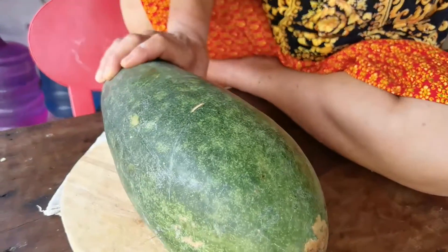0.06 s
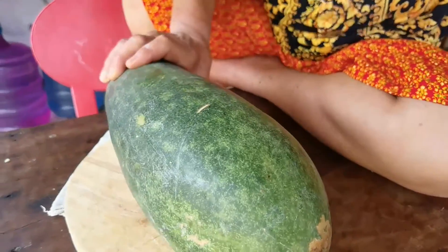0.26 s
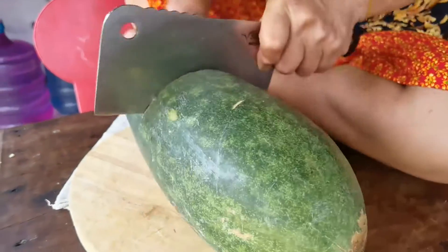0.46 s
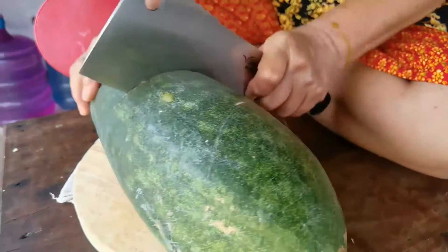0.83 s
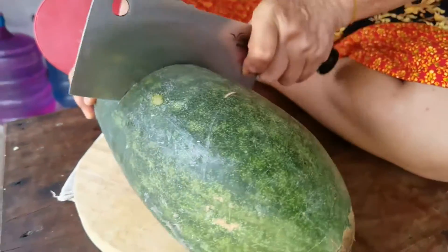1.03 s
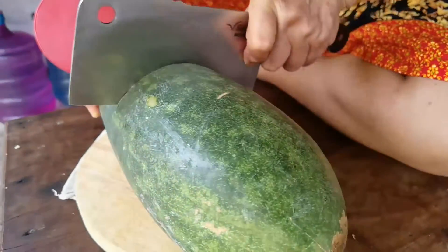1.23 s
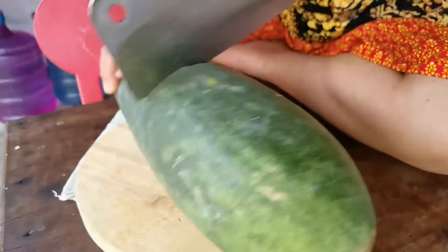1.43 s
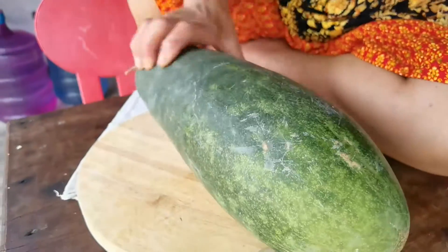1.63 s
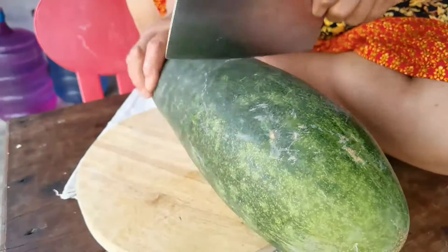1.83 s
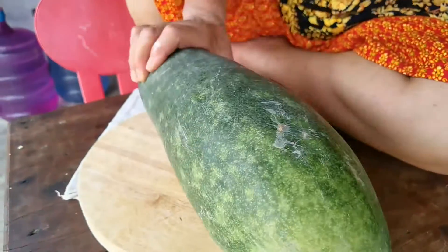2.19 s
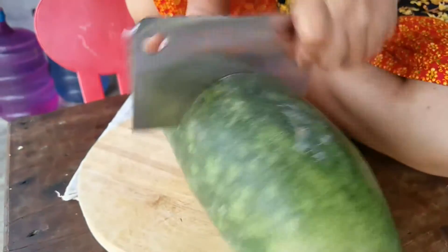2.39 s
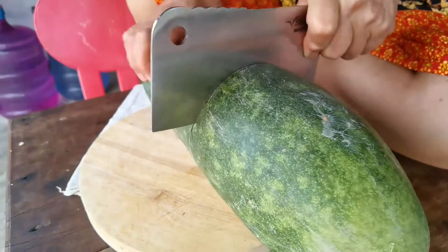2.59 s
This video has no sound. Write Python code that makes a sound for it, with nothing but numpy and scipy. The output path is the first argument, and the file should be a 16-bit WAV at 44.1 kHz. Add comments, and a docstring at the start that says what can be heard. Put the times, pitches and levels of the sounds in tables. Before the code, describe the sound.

Two close cleaver chops crack a melon's rind, slicing wet flesh and thudding on wood.

```python
"""A steel cleaver chops twice into a big melon on a wooden board, close by, over a low room rumble.
First the edge knocks on the rind and cracks it. The blade hisses into the wet flesh and wags in the cut,
while melon and table thud. A faint whistle comes and goes behind, and then the blade is drawn out.
A hand turns the melon, which rubs and bumps, and the free blade taps it and rings.
Last comes a dry tick as the hand takes hold, then the second chop cracks, thuds and wags."""
import sys
import numpy as np
from scipy import signal
from scipy.fft import rfft, irfft, next_fast_len
from scipy.io import wavfile
from scipy.ndimage import uniform_filter1d, map_coordinates

SR = 44100
rng = np.random.default_rng(int(sys.argv[2]) if len(sys.argv) > 2 else 0)


def transcribe(u):
    """Save the signal u as a 16-bit wav file named by the first command-line argument.

    u: samples, shape (n,) or (channels, n), limited to [-1, 1]; the rate is SR.
    q: integer samples, one column per channel.
    """
    v = np.clip(np.atleast_2d(u).T, -1, 1)
    q = np.round(v * 32767).astype(np.int16)
    wavfile.write(sys.argv[1], SR, q)


N = 121275

# A "colour" says how strong each frequency is in a noise. A "fade" is the time to drop by 60 dB.
# room rumble and hiss: (frequency [Hz], relative level [dB])
ROOM_COLOUR = [(30, -6.5), (80, -0.5), (130, -9.5), (240, -17), (330, -23.5), (700, -35.5), (2500, -36.5),
               (4000, -42), (8700, -36), (11500, -54.5), (16000, -100)]
# a faint, thin whistle: (start [s], length [s], level [dB])
WHISTLES = [(0.61, 0.13, -50), (0.863, 0.21, -60)]
# how alike a noise is in the two ears: (frequency [Hz], likeness [0 to 1])
EAR_LIKENESS = [(250, 0.94), (700, 0.57), (2000, 0.028), (9000, 0.026)]
# how long the room echoes: (frequency [Hz], fade [s])
ECHO_FADES = [(100, 0.17), (1000, 0.5), (12000, 0.088)]

# the hand taking hold: (time [s], level [dB])
GRIPS = [(2.2217, -37)]
# dry contact with the rind: (frequency [Hz], relative level [dB])
CONTACT_COLOUR = [(1500, -14), (2900, 2.5), (8500, -4), (14000, -30)]
# skin and blade rubbing the rind: (start [s], rise [s], hold [s], fade [s], level [dB])
RUBS = [(.11, 0.027, 0.054, 0.11, -46), (.55, 0.11, 0.041, 0.5, -44), (1.33, 0.068, 0.014, 0.35, -43),
        (1.5, 0.045, 0.039, 0.73, -49), (1.78, 0.099, 0.11, 0.088, -41.5)]
# the rubbing noise: (frequency [Hz], relative level [dB])
RUB_COLOUR = [(110, -9), (210, 19), (450, -11), (2000, -10), (4500, -3.5), (8600, -0.5), (12000, -19),
              (16000, -29)]
# the melon shifting: (start [s], rise [s], hold [s], fade [s], level [dB])
SCUFFS = [(.183, 0.0061, 0.0049, 0.12, -31), (.237, 0.0051, .003, 0.032, -29.5),
          (2.315, 0.015, 0.002, 0.024, -34)]
# its dull scuffing noise: (frequency [Hz], relative level [dB])
SCUFF_COLOUR = [(100, -0.5), (283, 2.5), (550, -9.5), (1500, -8.5), (4000, -26), (9000, -56)]
# the blade drawn out: (start [s], rise [s], hold [s], fade [s], level [dB])
PULLS = [(1.191, 0.049, 0.07, 0.28, -37.5)]
# its gritty noise: (frequency [Hz], relative level [dB])
PULL_COLOUR = [(300, -11.5), (2400, -4.5), (4000, -21), (5000, -3.5), (8400, 10), (11500, -3), (16000, -8)]
# wet flesh sliding along the blade: (start [s], rise [s], hold [s], fade [s], level [dB])
SLICES = [(0.217, .004, .02, 0.18, -30), (0.267, 0.062, 0.013, 0.3, -25.5),
          (2.297, 0.0047, 0.024, 0.16, -36), (2.327, 0.076, 0.034, 0.32, -31.5)]
# its wet hiss: (frequency [Hz], relative level [dB])
FLESH_COLOUR = [(80, -12.5), (200, 4.5), (450, -2.5), (1000, -17), (1900, -14.5), (2700, -9), (4300, -13),
                (5200, -5), (9000, -1.5), (11500, -13), (15000, -23)]

# the free blade tapping the rind: (time [s], ring level [dB], click level [dB])
TAPS = [(1.407, -33, -35.5), (1.7286, -32, -16), (1.772, -48, -22.5)]
# the click of a tap: (frequency [Hz], relative level [dB])
CLICK_COLOUR = [(400, -9), (1700, -25), (2460, -13), (4400, -34), (5300, -9.5), (6420, -3), (7800, -16),
                (9000, -3.5), (11500, -21.5), (16000, -32)]
# tones of the free blade: (frequency [Hz], relative level [dB], fade [s])
FREE_TONES = [(1314, -13.5, 0.12), (2370, -11.5, 0.14), (8410, 5.5, 0.19)]
# extra tones from a hard blow on the edge: (frequency [Hz], level [dB], fade [s])
EDGE_TONES = [(3385, -39, 0.3), (6480, -24, .04), (9900, -26.5, 0.2)]
# the stuck blade slapping the walls of the cut: (time [s], level [dB])
WAGS = [(0.343, -35), (0.39, -32), (0.439, -42), (0.483, -46), (2.42, -25.5), (2.471, -29.5), (2.52, -37),
        (2.562, -42.5), (2.606, -53.5), (2.679, -56)]
# tones of the stuck blade: (frequency [Hz], relative level [dB], fade [s])
STUCK_TONES = [(2775, -1, 0.02), (3815, -0.5, 0.028), (5167, 3, 0.029), (6560, -1, 0.047),
               (8353, 1.5, 0.077), (10200, 0.5, 0.048)]

# the melon bumping the board: (time [s], melon level [dB], table level [dB], melon pitch [factor])
BUMPS = [(.245, -19, -18.5, 1), (0.259, -15, -15, 0.97), (0.3, -16, -10, 0.91), (0.354, -22, -26, 0.93),
         (1.308, -27.5, -62, 0.91), (1.322, -20, -52, 0.64), (1.385, -31.5, -28.5, 0.92),
         (1.425, -35, -20.5, 0.91), (1.484, -26, -28.5, 0.93), (1.663, -71, -30, 0.78),
         (1.731, -14.5, -18, 0.94), (1.773, -33, -17, 0.92), (1.933, -33, -28, 0.99),
         (2.327, -22, -21, 0.97), (2.369, -11.5, -15, 0.95), (2.394, -43, -11.5, 1), (2.43, -21, -29, 0.86),
         (2.515, -30.5, -31.5, 0.9), (2.648, -39.5, -28, 0.78)]
# tones of the hollow melon: (base frequency [Hz], relative level [dB], fade [s])
MELON_TONES = [(129.9, -14.5, 0.26), (191.5, -4, 0.16), (222.3, -2, 0.15), (252.6, -4.5, 0.22)]
# tones of the table: (frequency [Hz], relative level [dB], fade [s])
TABLE_TONES = [(45.2, -6, 0.042), (62.84, 0.5, 0.19), (101.1, -17, 0.47)]

# the edge meeting the rind: (time [s], level [dB])
KNOCKS = [(.188, -33.5)]
# tones of the hard rind: (frequency [Hz], relative level [dB], fade [s])
RIND_TONES = [(779, 5.5, 0.078), (1390, -9.5, 0.09)]
# the blade breaking through the rind: (start [s], length [s], level [dB])
BITES = [(0.226, 0.013, -14.5), (2.309, 0.01, -15.5)]
# single snaps as the rind splits: (time [s], level [dB])
SNAPS = [(0.2333, -1), (0.2401, -4.5), (2.3135, -3.5), (2.3193, -3), (2.3259, -8.5)]
# the edge catching in the cut: (time [s], level [dB])
CATCHES = [(0.768, -30.5), (1.214, -31.5), (1.353, -28.5), (2.646, -34.5)]
# the cracking noise: (frequency [Hz], relative level [dB])
RIND_COLOUR = [(300, -50), (800, -25), (1500, -19), (2000, -29), (2840, -15), (4200, -21.5), (5200, -11.5),
               (7300, -9.5), (8640, -0.5), (10900, -17.5), (15000, -28.5)]


def amp(db):
    """Turn decibels into a number to multiply a sound by."""
    return 10 ** (np.asarray(db) / 20)


def unit(x):
    """Scale a signal to an average strength (rms) of 1."""
    return x / np.sqrt(np.mean(x ** 2) + 1e-20)


def look_up(points, hz):
    """Read between the rows of a (frequency, value) table, on a log frequency scale."""
    frequencies, values = np.transpose(points)
    return np.interp(np.log(hz + 1), np.log(frequencies + 1), values)


def since(s):
    """Seconds since time s, zero before it."""
    return np.maximum(np.arange(N) / SR - s, 0)


def wobble(rate):
    """A smooth curve through `rate` random values a second."""
    return map_coordinates(rng.standard_normal(int(N * rate / SR) + 4), [np.arange(N) * rate / SR])


def filtered(x, response):
    """Multiply each frequency in x by response(hz)."""
    size = next_fast_len(N + 8192)
    return irfft(rfft(x, size) * response(np.fft.rfftfreq(size, 1 / SR)), size)[..., :N]


def noise(colour, grain_db, grain_rate, pulses=1):
    """Stereo noise of strength 1, clumped into grains or pulses, its colour drifting in patches."""
    def colour_and_width(hz):
        angle = np.arccos(np.clip(look_up(EAR_LIKENESS, hz), -1, 1)) / 2
        return amp(look_up(colour, hz)) * [np.cos(angle), np.sin(angle)]

    spectra = signal.stft(rng.standard_normal((2, N)), nperseg=512)[2]
    patches = uniform_filter1d(rng.standard_normal(spectra.shape[1:]), size=3, axis=0)
    patches = unit(uniform_filter1d(patches, size=12, axis=1))
    drift_db = 3.5 * patches * np.minimum(np.arange(len(patches)) / 8, 1)[:, None]  # less in the bass
    patchy = signal.istft(spectra * amp(drift_db), nperseg=512)[1][:, :N]
    grainy = patchy * amp(grain_db * wobble(grain_rate))
    middle, side = filtered(grainy * pulses, colour_and_width)
    return unit(np.array([middle + side, middle - side]))


def stroke(start, rise, hold, fade, db):
    """Loudness curve of a movement: it swells, holds and dies away."""
    return amp(db - 60 * since(start + rise + hold) / fade) * np.minimum(since(start) / rise, 1)


def hit(s, rise, fade):
    """Loudness curve of something struck at time s."""
    t = since(s)
    return (1 - np.exp(-t / rise)) * amp(-60 * t / fade)


def ring(s, tones, rise, spread, blur, pitch=1):
    """Fading tones from time s; spread puts the ears out of step, blur makes the tones waver."""
    t = np.arange(SR // 2) / SR
    out = np.zeros((2, N + SR))
    for hz, db, fade in tones:
        ear_phase = spread * rng.standard_normal((2, 1))
        drift = blur * np.cumsum(rng.standard_normal(len(t))) / np.sqrt(SR)
        level = amp(db - 60 * t / fade) * (1 - np.exp(-t / rise))
        wave = np.sin(2 * np.pi * hz * pitch * t + ear_phase + drift)
        out[:, round(s * SR):][:, :len(t)] += level * wave
    return out[:, :N]


def fibres(typical_per_s=700):
    """Fibres part one after another at an uneven rate, each with a short, sharp pulse."""
    parted = np.cumsum(typical_per_s * amp(4 * wobble(typical_per_s / 2))) / SR
    return np.exp(-3 * (parted % 1))


def background(whistle_hz=3217):
    """Steady room rumble and hiss, with a faint whistle that comes and goes."""
    swell = sum(amp(db) * np.sin(np.pi * np.minimum(since(s) / length, 1)) for s, length, db in WHISTLES)
    whistle = np.array([wobble(160) for ear in range(2)]) * np.sin(2 * np.pi * whistle_hz * since(0))
    return amp(-44.5) * noise(ROOM_COLOUR, grain_db=1.5, grain_rate=830) + swell * whistle


def room_echo(x):
    """The room smears each sound into a short tail, a separate one for each ear."""
    hz, t, spectra = signal.stft(rng.standard_normal((2, SR // 2)), SR, nperseg=256)
    dying = amp(-60 * t / look_up(ECHO_FADES, hz)[:, None])
    tail = signal.istft(spectra * dying, SR, nperseg=256)[1]
    delayed = np.pad(x, ((0, 0), (200, 0)))
    return signal.fftconvolve(delayed, tail / np.linalg.norm(tail[0]), axes=1)[:, :N]


def hand_grip():
    """The hand takes hold with a short, dry tick."""
    tick = sum(amp(db) * hit(s, rise=0.00079, fade=0.05) for s, db in GRIPS)
    return tick * noise(CONTACT_COLOUR, grain_db=-7, grain_rate=800)


def rubbing():
    """The blade hisses into the flesh and back out; the melon scuffs and rubs as it moves."""
    wet = noise(FLESH_COLOUR, grain_db=2, grain_rate=900, pulses=fibres())
    grit = noise(PULL_COLOUR, grain_db=2, grain_rate=700, pulses=fibres())
    grit *= amp([[0.75], [-0.75]])  # a little to the left
    scuff = noise(SCUFF_COLOUR, grain_db=2, grain_rate=400)
    rub = noise(RUB_COLOUR, grain_db=2, grain_rate=1000)
    layers = (SLICES, wet), (PULLS, grit), (SCUFFS, scuff), (RUBS, rub)
    return sum(stroke(*move) * sound for moves, sound in layers for move in moves)


def free_blade(stop_s=0.051):
    """Each tap clicks, stops the earlier ring and starts a new one; the hardest adds the edge tones."""
    hardest_time = max(TAPS, key=lambda tap: tap[-1])[0]
    next_times = [tap[0] for tap in TAPS[1:]] + [N / SR]
    ringing = 0
    for (s, db, _), next_time in zip(TAPS, next_times):
        steel = amp(db) * ring(s, FREE_TONES, rise=0.00079, spread=0.58, blur=12)
        if s == hardest_time:
            steel += ring(s, EDGE_TONES, rise=0.0012, spread=0.89, blur=16)
        ringing += steel * amp(-60 * since(next_time) / stop_s)
    clicks = sum(amp(db) * hit(s, rise=0.0014, fade=0.042) for s, _, db in TAPS)
    return ringing + clicks * noise(CLICK_COLOUR, grain_db=4, grain_rate=440)


def stuck_blade():
    """Wagging and, more weakly, sliding rub the blade on the flesh and make it ring in a muffled way."""
    wags = sum(stroke(s, rise=0.003, hold=0.007, fade=0.03, db=db) for s, db in WAGS)
    slaps = wags * noise(CONTACT_COLOUR, grain_db=1, grain_rate=1000)
    slide = sum(stroke(*move) for move in SLICES + PULLS) * unit(fibres() * rng.standard_normal((2, N)))
    blade = ring(0, STUCK_TONES, rise=0.00034, spread=0.9, blur=0)[:, :SR // 2]
    blade /= np.linalg.norm(blade[0])
    ringing = signal.fftconvolve(slaps + amp(-13) * slide, blade, axes=1)[:, :N]
    return ringing + 0.5 * slaps


def thuds(muffle_hz=442):
    """Each bump sounds the hollow melon and, more slowly, the table; the soft underside dulls both."""
    melon = sum(amp(db) * ring(s, MELON_TONES, rise=0.0028, spread=0.12, blur=3, pitch=pitch)
                for s, db, _, pitch in BUMPS)
    table = sum(amp(db) * ring(s, TABLE_TONES, rise=0.008, spread=0.08, blur=1.2)
                for s, _, db, _ in BUMPS)
    table *= amp([[-1.75], [1.75]])  # a little to the right
    return filtered(melon + table, lambda hz: 1 / (1 + (hz / muffle_hz) ** 6))


def rind_knock():
    """The edge meets the hard rind just before breaking through, and the rind rings briefly."""
    return sum(amp(db) * ring(s, RIND_TONES, rise=0.0024, spread=1, blur=27) for s, db in KNOCKS)


def rind_crack():
    """The edge tears the rind in a dense burst with single snaps; later it catches in the cut."""
    bites = sum(stroke(s, rise=0.0093, hold=length - 0.003, fade=0.035, db=db) for s, length, db in BITES)
    snaps = sum(amp(db) * hit(s, rise=0.00084, fade=0.013) for s, db in SNAPS)
    catches = sum(amp(db) * hit(s, rise=0.0012, fade=0.016) for s, db in CATCHES)
    cracking = noise(RIND_COLOUR, grain_db=1, grain_rate=900)
    tearing = noise(RIND_COLOUR, grain_db=-1, grain_rate=700, pulses=fibres())
    return bites * tearing + (snaps + catches) * cracking


def scene():
    """Add up the close sounds, their echo and the background."""
    near = rind_knock() + rind_crack() + rubbing() + stuck_blade() + free_blade() + hand_grip() + thuds()
    return near + amp(-11.5) * room_echo(near) + background()


def record(dry):
    """Round off the tallest peaks, thin the deepest rumble and cut the very highest treble."""
    ceiling, low_hz, top_hz = 0.85, 34, 15900
    rounded = dry / (1 + (dry / ceiling) ** 6) ** (1 / 6)
    return filtered(rounded, lambda hz: (hz < top_hz) * (1 - 1 / (1 + (hz / low_hz) ** 8)))


dry = scene()
out = record(dry)
transcribe(out)
```